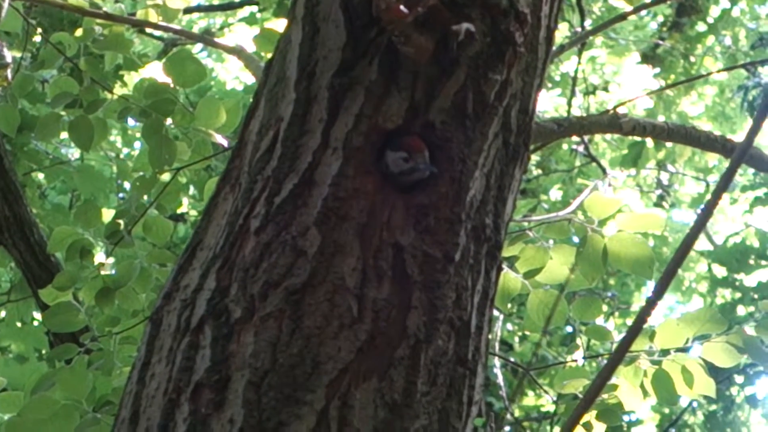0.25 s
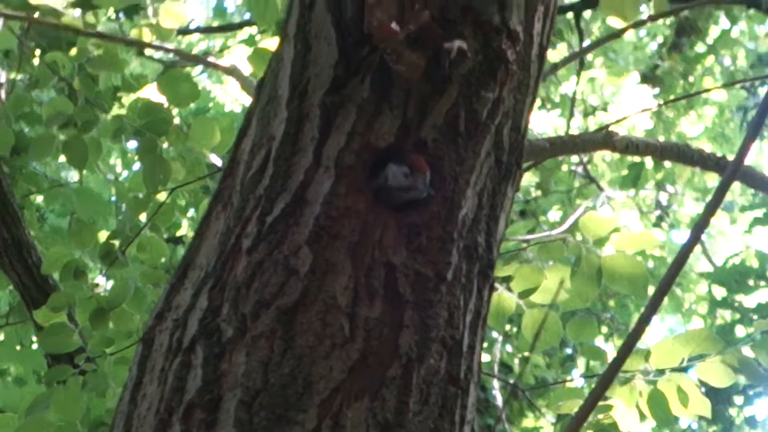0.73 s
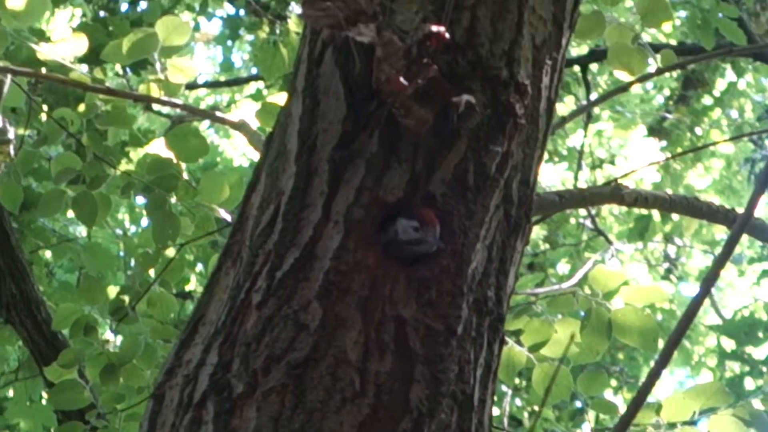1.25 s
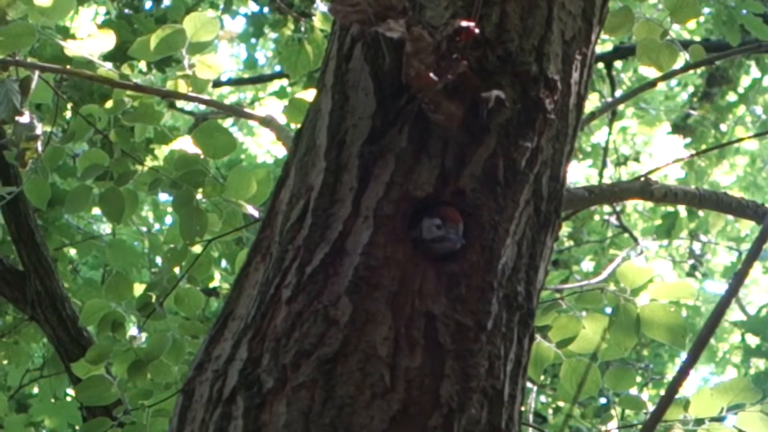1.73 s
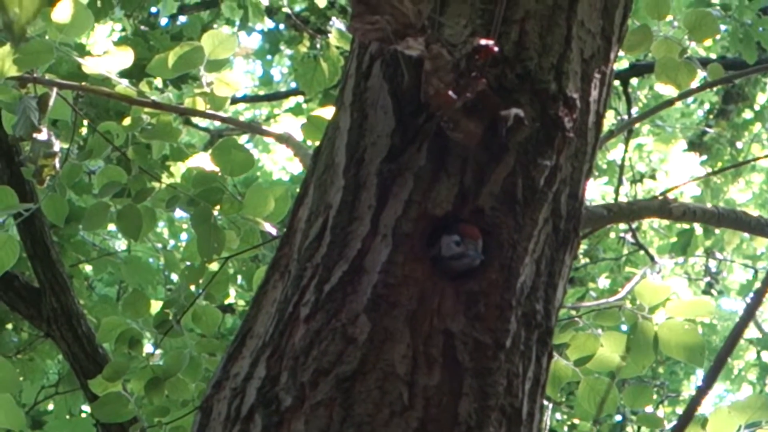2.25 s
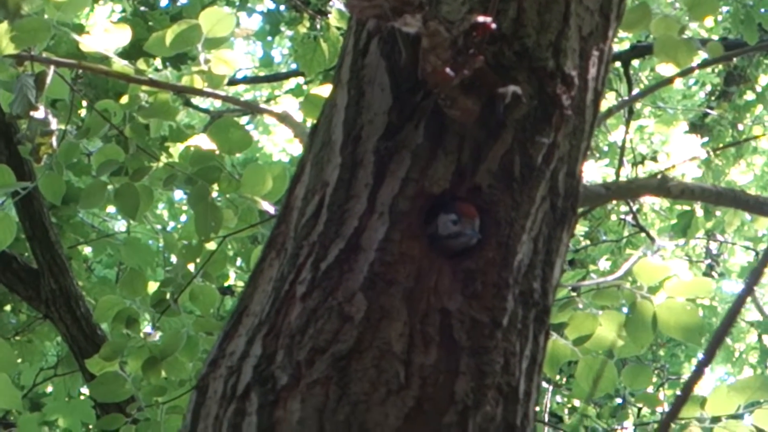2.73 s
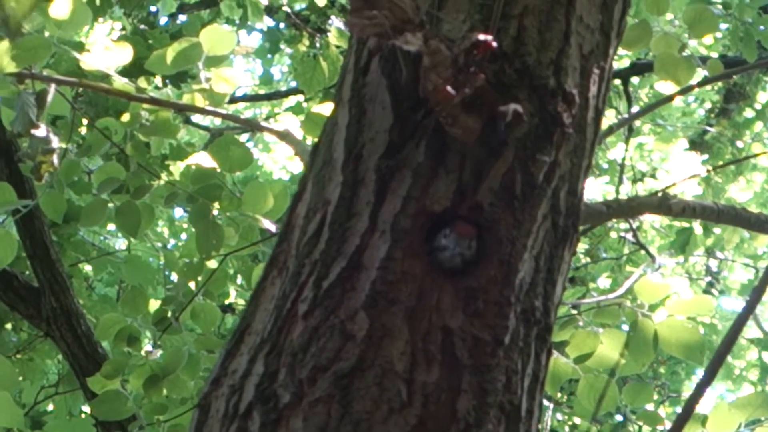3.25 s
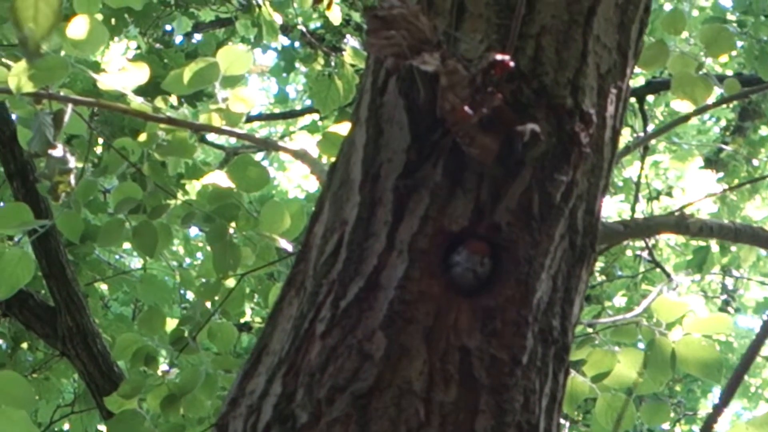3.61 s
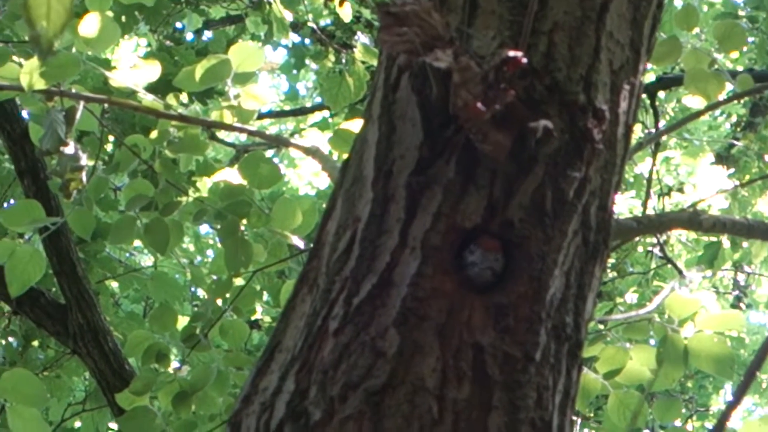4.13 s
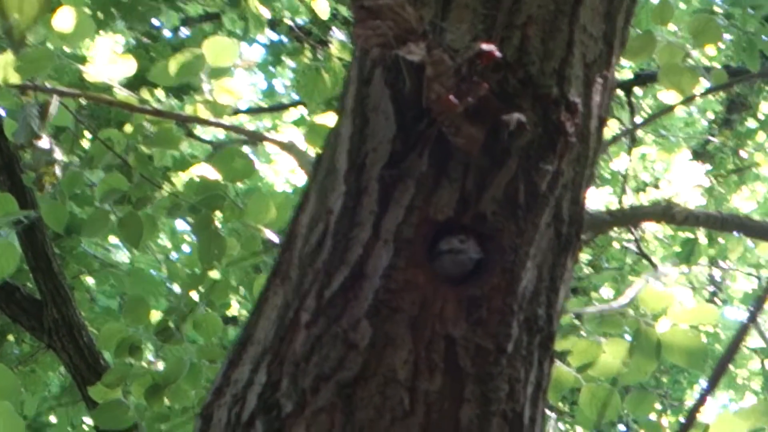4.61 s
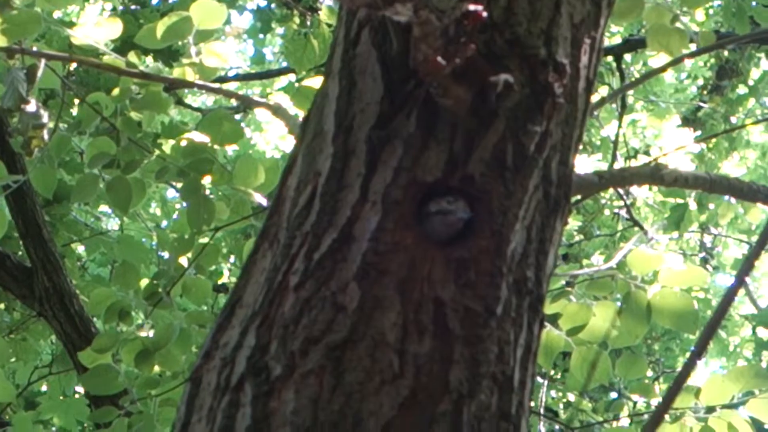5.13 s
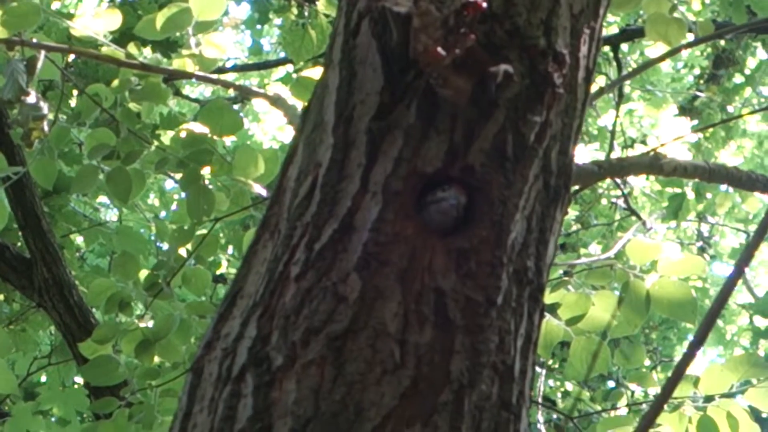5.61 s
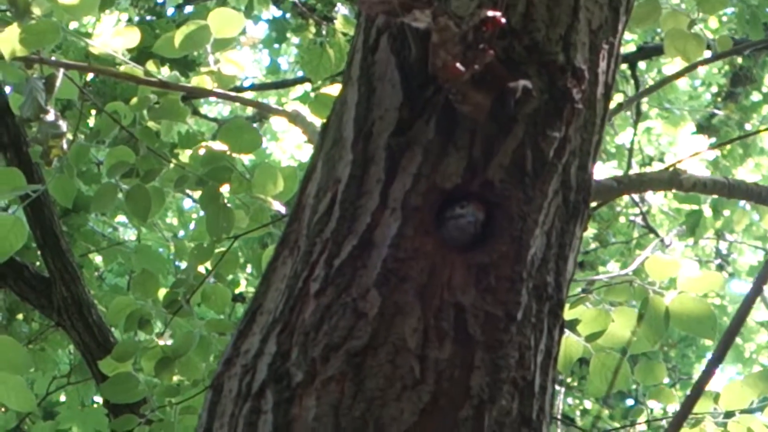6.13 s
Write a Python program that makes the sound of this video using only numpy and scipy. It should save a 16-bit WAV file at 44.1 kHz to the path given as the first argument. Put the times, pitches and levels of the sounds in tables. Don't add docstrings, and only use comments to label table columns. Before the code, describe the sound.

Sharp, bright begging chips burst from a nest hole, loud and near, ringing briefly between trunks. The first comes at half a second, the next two are well apart, then five follow more quickly. A distant warbling whistle, smeared by echoes, fades out before the middle. Quiet traffic rumble, a faint engine pulling away, airy leaf hiss, a thin insect tone and tiny twig snaps fill the stereo background.

```python
import sys
import numpy as np
from scipy import signal
from scipy.fft import rfft, irfft
from scipy.io import wavfile
from scipy.ndimage import uniform_filter1d

SR = 44100
rng = np.random.default_rng(int(sys.argv[2]) if len(sys.argv) > 2 else 0)


def boost_factor(decibels):
    exponent = np.asarray(decibels, float) / 20
    return 10 ** exponent


def to_wav(s):
    ch = np.atleast_2d(s).T
    pcm = np.round(np.clip(ch, -1, 1) * 32767)
    wavfile.write(sys.argv[1], SR, pcm.astype(np.int16))


N = 280917
EDGE_HZ = 16050
SIDES = np.array([[.5], [-.5]])

# t/s when the pitch has risen, top f/Hz, arch length/ms,
# gape as level/dB of the 2nd partial, aim as level/dB of the higher partials
CHICK_CALLS = [
    (0.5092, 2439, 18.1, 5.5, -4.5),
    (1.7583, 2423, 24, 4.5, -6.5),
    (3.0029, 2492, 22.6, 5.5, -6.5),
    (3.399, 2523, 20.9, 4, -0.5),
    (4.2112, 2583, 20.4, 7.5, -3),
    (4.6551, 2456, 20.2, 3.5, -4.5),
    (5.2964, 2466, 19.5, 3, -3.8),
    (5.834, 2491, 20.3, 3.5, -3),
]
# f/Hz, level/dB, left-right/dB
THROAT = [(1200, -10, 1), (2000, -1, 1), (2570, 3, 0), (3450, 2, -0.5), (4540, 2.5, 1), (4900, 3, -2.8),
          (5370, 0, 12), (6710, 10.5, 4), (7300, 3.5, 3.5), (8000, 5.5, 0.5), (9640, -4.5, 1),
          (13200, -2.5, -0.5), (15600, -22, -7)]
# delay/ms, level/dB, left-right/dB
TRUNK_ECHOES = [
    (3.113, -16.5, 10),
    (11.39, -12, 0),
    (19.01, -31.5, -30),
    (29., -44.5, 9),
    (41.26, -21, -0.5),
    (55.5, -19.5, 1),
]
# f/Hz, t/s
NEAR_FADE = [(1200, 0.32), (2500, 0.56), (5000, .55), (7500, 0.53), (13000, 0.59)]
# f/Hz, level/dB
NEAR_COLOURING = [(1200, 7), (2500, -0.68), (5000, 4), (7500, -2.5), (9500, -5), (14000, -2.5)]
# f/Hz, likeness/0..1
TAIL_LIKENESS = [(1200, .85), (2500, .82), (5000, 0.45), (8000, 0.088), (14000, .05)]
# t/s, length/s, from f/Hz, to f/Hz, level/dB
SONG_GLIDES = [(.0, 0.053, 1900, 2214, -47), (0.049, 0.06, 2200, 2240, -46), (.22, .21, 2152, 1865, -43),
               (0.419, .07, 2750, 2460, -48), (.77, .1, 1688, 2060, -41.5), (.87, 0.083, 2080, 2106, -36),
               (.94, .04, 2110, 1870, -35), (1.01, .09, 1950, 2180, -38), (1.1, .1, 2070, 2160, -29.5),
               (1.2, .12, 2146, 1930, -37.5), (1.34, 0.08, 2900, 2810, -41.5),
               (1.408, 0.137, 2830, 2810, -38), (1.55, .19, 2804, 2795, -46),
               (1.93, .14, 2420, 2100, -41.5), (2.16, .07, 2252, 2040, -43.5), (2.23, .12, 2000, 2270, -37),
               (2.35, .04, 2300, 2660, -41.5), (2.39, .07, 2680, 2390, -46)]
# t/s, level/dB
ENGINE_LOUDNESS = [(0.0, -51), (.35, -60.5), (1.1, -56.5), (2.05, -50), (2.5, -60.5), (2.9, -55.5),
                   (3.1, -80), (3.65, -58.5), (3.84, -43), (4.0, -55.5), (4.3, -49), (4.7, -52),
                   (4.85, -45.5), (5.0, -59)]
FIRING_LEVELS = [-1.5, -2, -14]
# t/s, peak level/dB, ring f/Hz, fade/ms
TWIG_TICKS = [
    (3.162, -40, 4500, 2.3),
    (3.6, -40.5, 1300, 6.),
    (3.683, -29.5, 2000, 2.1),
    (3.747, -33, 2498, 0.96),
    (3.897, -38.5, 4890, 1.73),
    (3.905, -34.5, 2996, 1.06),
]
# f/Hz, level/dB per Hz
AIR_SPECTRUM = [(15, -46), (26, -19), (40, -2.5), (58, 6.5), (100, -5), (170, -0.76), (300, -1),
                (500, -3.5), (750, -10), (1500, -11.5), (2300, -12.5), (4000, -20.5), (6500, -21.5),
                (16000, -26.5)]
# f/Hz, likeness/0..1
AIR_LIKENESS = [(25, 0.88), (60, .998), (130, 0.98), (290, 0.91), (640, 0.69), (1410, 0.47), (3100, 0.21),
                (6820, .03), (15000, .01)]
# f/Hz, level/dB
COVER_DEPTH = [(2300, 21.), (5000, 16.), (8000, 9.), (10500, 7.), (13500, 7.)]


def evened(x):
    return x / np.sqrt(np.mean(x ** 2) + 1e-20)


def read(points, hz, axis=1):
    table = np.transpose(points)
    return np.interp(np.log(hz + 1), np.log(table[0] + 1), table[axis])


def add(mix, s, sound):
    part = mix[:, round(s * SR):][:, :sound.shape[1]]
    part += sound[:, :part.shape[1]]


def drift(length, smooth_s):
    span = int(smooth_s * SR)
    return evened(uniform_filter1d(uniform_filter1d(rng.standard_normal(length), span), span))


def pair(length, magnitude, likeness, size):
    hz = np.fft.rfftfreq(size, 1 / SR)[:, None]
    t = np.arange(4 * length // size + 5) * size / 4 / SR
    a, b, c, d = rng.standard_normal((len(t), len(hz), 4)).T
    same = np.clip(read(likeness, hz), -1, 1)
    left = a + 1j * b
    right = same * left + np.sqrt(1 - same ** 2) * (c + 1j * d)
    z = np.array([left, right]) * magnitude(hz, t)
    return signal.istft(z, nperseg=size, noverlap=size * 3 // 4)[1][:, :length]


def forest(x, decay, build_s):
    length = SR * 5 // 8
    clumps = boost_factor(1.2 * drift(length, .006))
    build_up = 1 - np.exp(-np.arange(length) / SR / build_s)
    tail = pair(length, decay, TAIL_LIKENESS, size=256) * clumps * build_up
    return signal.fftconvolve(x, evened(tail) / np.sqrt(length), axes=1)


def chick(s, top_hz, length_ms, gape_db, aim_db):
    call_span = 4096
    start, top, fall_from, end = -.2, .4, .6, 1.6
    u = np.arange(start, end, 1000 / length_ms / SR)

    climb = .48 * (np.maximum(top - u, 0) / (top - start)) ** 2.87
    past = np.maximum(u - fall_from, 0) ** 2.8
    slide = .8 * past / (past + .66 ** 2.8)
    share = 1 - climb - slide
    hz = top_hz * share * (1 + .012 * drift(call_span, .0006)[:len(u)])
    phase = 2 * np.pi * np.cumsum(hz) / SR

    effort_db = 2.5 + np.interp(u, [start, 0.052, 1.02, end - .15, end], [-11.5, 0, 0, -9, -9 - 5])
    thinning_db = -0.41 * (length_ms - 20.1)

    rise = np.exp(-((u - .08) / 0.22) ** 2)
    fall = np.exp(-((u - 1.03) / 0.098) ** 2)
    rise_db = 7 - .3 * aim_db
    fall_db = 10.5 - 1.6 * gape_db
    third_db = 0.95 - .8 * gape_db
    closing_db = -14 * (1 - share) * (u > top)
    breath_db = -32 + 31.5 * (1 - share)

    out = np.zeros((2, len(u)))
    for k, db in enumerate([0, gape_db, third_db, aim_db, aim_db, aim_db, aim_db], 1):
        pan_db = read(THROAT, k * hz, axis=2) - 1.13
        breathy = 1 + boost_factor(breath_db) * k ** 0.41 * rng.standard_normal(call_span)[:len(u)]
        flutter_db = (.9 + .22 * k) * drift(call_span, .002)[:len(u)]
        flutter_db = flutter_db - flutter_db.mean()
        lag = SIDES * k ** 1.58 * 0.083 * rng.choice([-1, 1])
        accent_db = (rise_db * rise + closing_db) * (k > 2) + fall_db * fall * (k == 2)
        level_db = db + accent_db + flutter_db + read(THROAT, k * hz) + SIDES * pan_db
        out += boost_factor(level_db) * breathy * np.sin(k * phase + lag) * (k * hz < EDGE_HZ)
    out *= boost_factor(-24 + thinning_db + effort_db) * signal.windows.tukey(len(u), .06)
    return s + start * length_ms / 1000, out


def call_noise(call, lead_ms, db):
    lead, span = int(lead_ms * SR / 1000), 4096
    colour = uniform_filter1d(abs(rfft(call, span)) ** 2, size=110, axis=1) ** 0.39
    noise = evened(irfft(colour * rfft(rng.standard_normal((2, span))), span))
    length = lead + int(call.shape[1] * .8)
    swell_db = np.interp(np.arange(length), [0, lead * .55, lead * .85, length], [-6., -4., 5., 1.5])
    strength = boost_factor(db + swell_db) * np.sqrt(np.mean(call ** 2))
    return strength * noise[:, :length] * signal.windows.tukey(length, .04)


def near_wood(call):
    def decay(hz, t):
        return boost_factor(read(NEAR_COLOURING, hz) - 60 * t / read(NEAR_FADE, hz))

    wet = boost_factor(-9) * forest(call, decay, 0.0076)
    add(wet, 0, call)
    dull = signal.sosfilt(signal.butter(3, 8200., fs=SR, output="sos"), call)
    for ms, db, pan_db in TRUNK_ECHOES:
        add(wet, ms / 1000, dull * boost_factor(db + SIDES * pan_db))
    return wet


def songbird():
    warble_hz, fade_s = 33.1, 0.92
    dry = np.zeros((1, N))
    unrest = 2.5 * drift(N, 0.0319)
    for s, length, from_hz, to_hz, db in SONG_GLIDES:
        t = np.arange(0, length, 1 / SR)
        hz = to_hz + (from_hz - to_hz) * np.exp(-2.6 * t / length)
        depth_hz = 19 if to_hz > 2700 else 58
        hz = hz + depth_hz * np.sin(2 * np.pi * warble_hz * t + unrest[round(s * SR):][:len(t)])
        swell = np.minimum(t / .03, 1) * boost_factor(db - 5 * t / length) * signal.windows.tukey(len(t), .1)
        add(dry, s, (swell * np.sin(2 * np.pi * np.cumsum(hz) / SR))[None])
    echoes = forest(dry, lambda hz, t: boost_factor(-60 * t / fade_s) + 0 * hz, 0.005)
    return boost_factor(-2.5) * dry + echoes[:, :N]


def engine():
    pull_s, lift_s, gone_s = 2.35, 4.83, 5.2
    s, db = np.transpose(ENGINE_LOUDNESS)
    t = np.arange(N) / SR
    gain_hz = 31.2 * (np.clip(t, pull_s, lift_s) - pull_s)
    sag_hz = -21.5 * np.maximum(t - lift_s, 0)
    hz = 83.6 + gain_hz + sag_hz
    turns = np.cumsum(hz * (1 + 0.0058 * drift(N, .04))) / SR
    tones = np.zeros(N)
    for k, order_db in enumerate(FIRING_LEVELS, 1):
        fading_db = 2.2 * drift(N, 0.066)
        tones += boost_factor(order_db + fading_db) * np.sin(2 * np.pi * k * turns)
    leaving = np.clip((gone_s - t) / 0.11 + 1, 0, 1)
    return np.sqrt(2) * boost_factor(np.interp(t, s, db)) * tones * leaving


def ticks():
    out, t = np.zeros((2, N)), np.arange(800) / SR
    for s, db, hz, fade_ms in TWIG_TICKS:
        ring = np.sin(2 * np.pi * hz * t) * np.exp(-1000 * t / fade_ms)
        snap = 0.34 * rng.standard_normal((2, len(t))) * np.exp(-t / 0.0012)
        add(out, s, boost_factor(db) * (ring + snap))
    return out


def air():
    def magnitude(hz, t):
        patches = rng.standard_normal((len(t), len(hz))).T
        patches = evened(uniform_filter1d(uniform_filter1d(patches, 9, 0), 18, 1))
        low = 1 / (1 + (hz / 1200.0) ** 2)
        lean_db = SIDES[:, :, None] * -1.4 / (1 + (360 / (hz + 1)) ** 2)
        pass_s = 3.9
        rumble_db = 2.5 * np.exp(-((t - pass_s) / .6) ** 2) + 0.26 * (t - pass_s)
        return boost_factor(lean_db + read(AIR_SPECTRUM, hz) + 0.96 * patches + low * rumble_db)

    t = np.arange(N) / SR
    insect_db = -69.5 + 3.7 * drift(N, .05)
    insect = boost_factor(insect_db) * np.sin(2 * np.pi * 3130 * t + 1.1 * drift(N, 0.0095))
    return boost_factor(-45) * evened(pair(N, magnitude, AIR_LIKENESS, size=1024)) + insect


def scene():
    mix = air() + engine() + songbird() + ticks()
    lead_ms = 18
    for row in CHICK_CALLS:
        s, call = chick(*row)
        add(mix, s, near_wood(call))
        add(mix, row[0] - lead_ms / 1000, call_noise(call, lead_ms, -15.5))
    return mix


def shadow(x):
    hz, t, z = signal.stft(x, SR, nperseg=1024)
    power = (abs(z) ** 2).mean(0)
    power = uniform_filter1d(uniform_filter1d(power, size=7, axis=0), size=3, axis=1)
    level_db = 10 * np.log10(power + 1e-20)
    slope_db = 22 * np.log2(hz[:, None] + 1)
    loudest_db = level_db[hz > 4000].max(axis=0)
    cover_db = np.maximum.accumulate(level_db + slope_db, axis=0) - slope_db
    cover_db = cover_db - read(COVER_DEPTH, hz)[:, None]
    cover_db = np.maximum(cover_db, loudest_db - 32)
    spared = (hz[:, None] < 2300) | (loudest_db > loudest_db.max() - 8)
    return signal.istft(z * ((level_db > cover_db) | spared), SR, nperseg=1024)[1][:, :N]


def roll_off(x):
    return signal.sosfilt(signal.butter(12, 16800, fs=SR, output="sos"), x)


def record(dry):
    cut = signal.sosfilt(signal.butter(2, 45., "high", fs=SR, output="sos"), dry)
    held = cut / (1 + abs(cut / .86) ** 6) ** (1 / 6)
    edge = signal.firwin(255, EDGE_HZ, window=("kaiser", 9), fs=SR)
    limited = signal.oaconvolve(held, edge[None], "same")
    return roll_off(shadow(limited))


dry = scene()
out = record(dry)
to_wav(out)
```